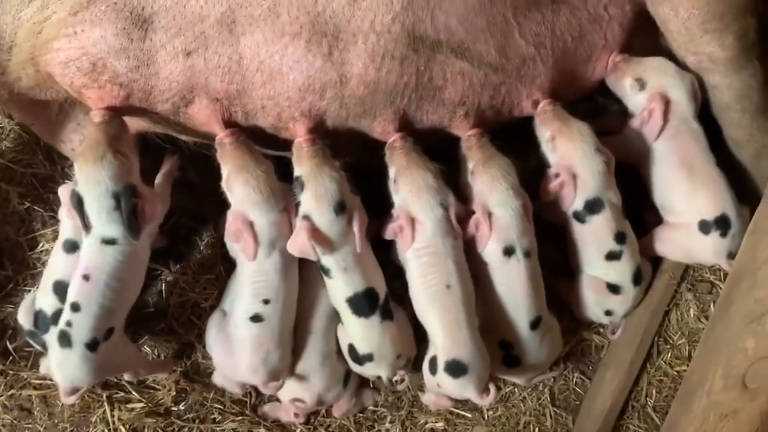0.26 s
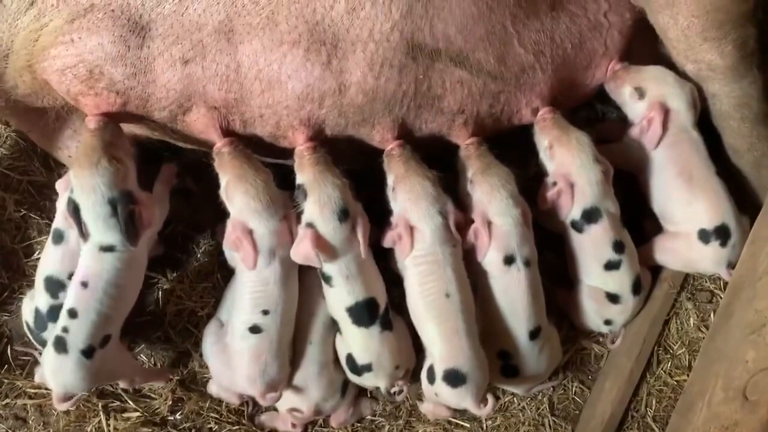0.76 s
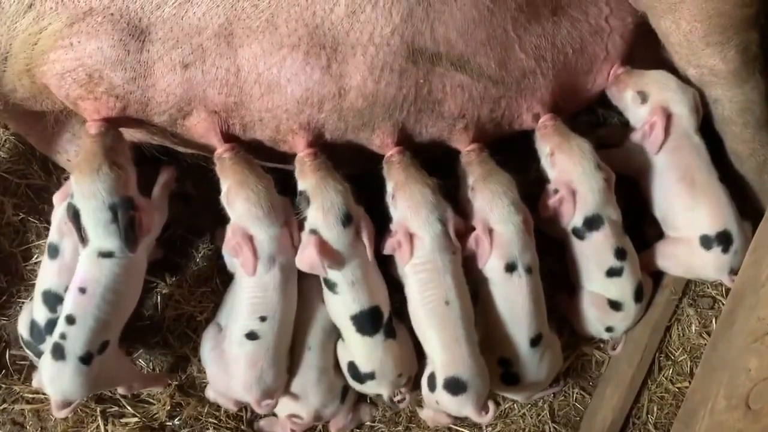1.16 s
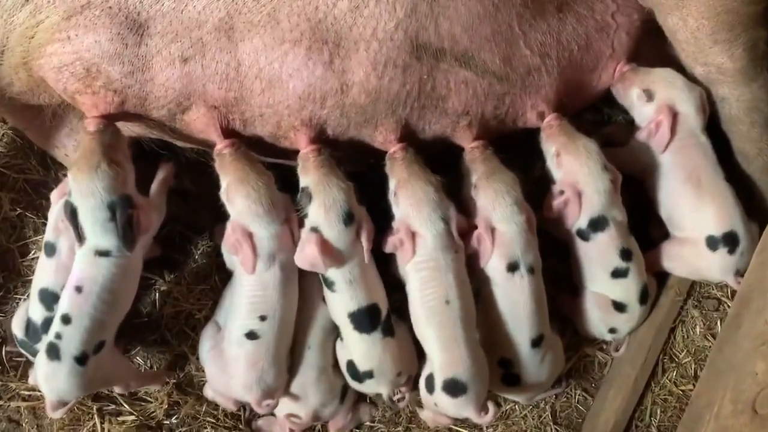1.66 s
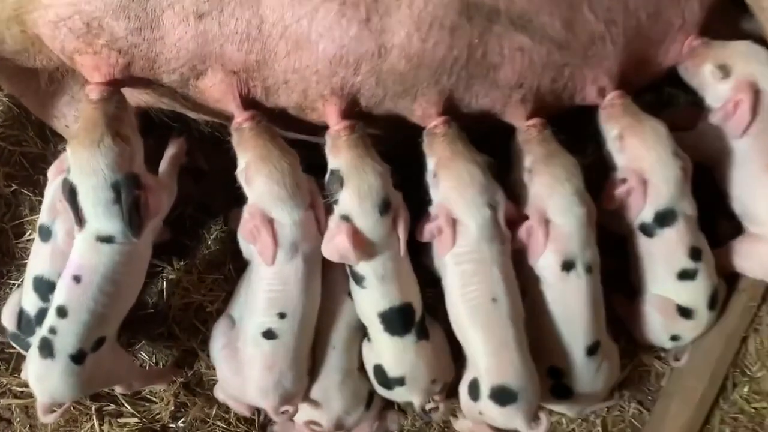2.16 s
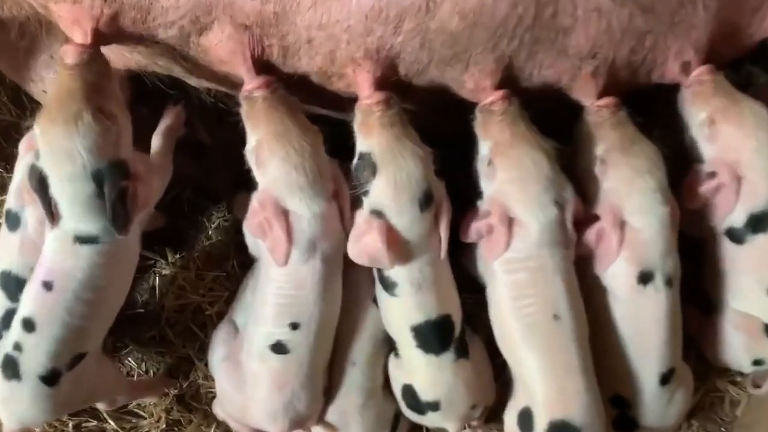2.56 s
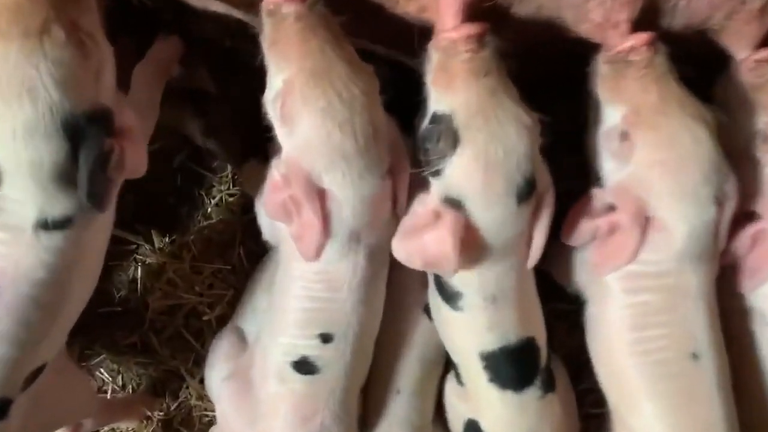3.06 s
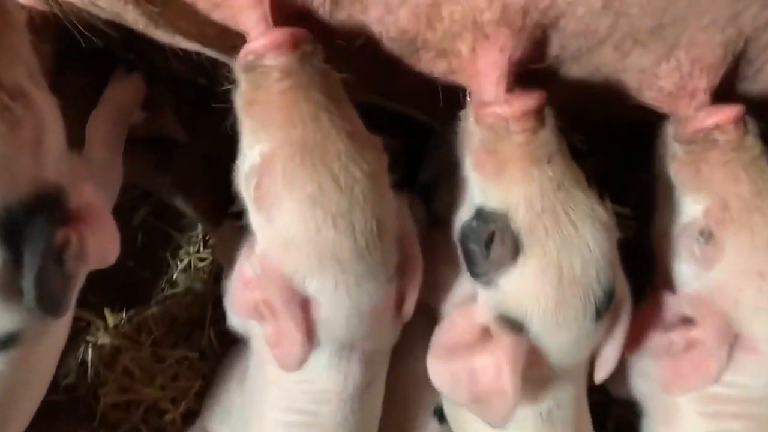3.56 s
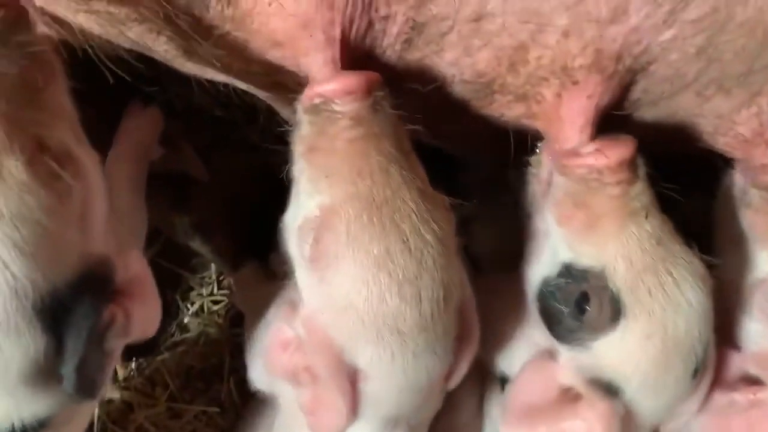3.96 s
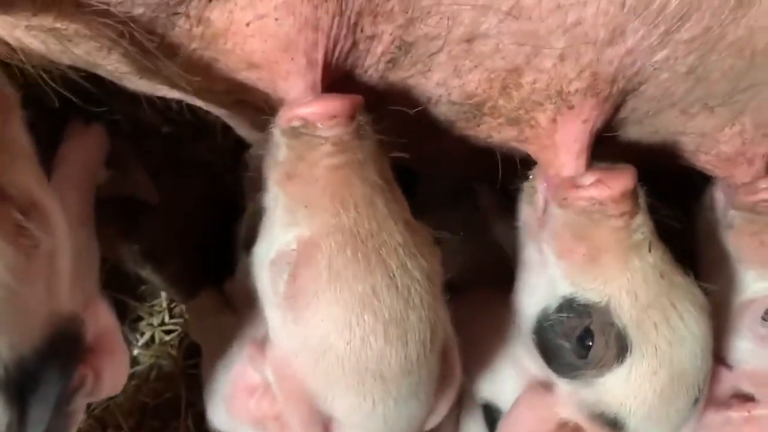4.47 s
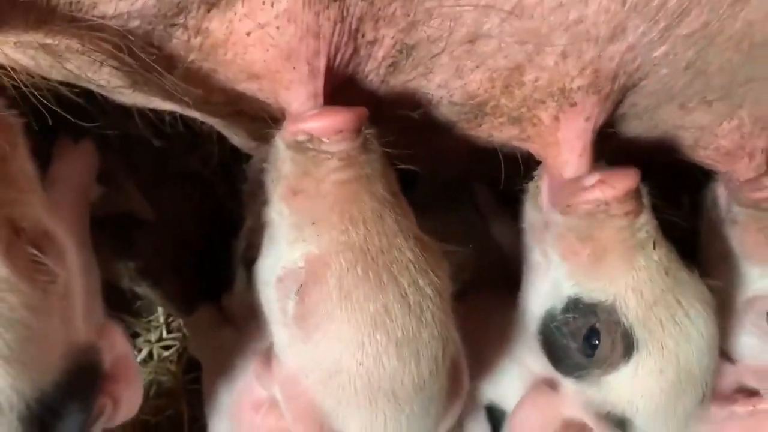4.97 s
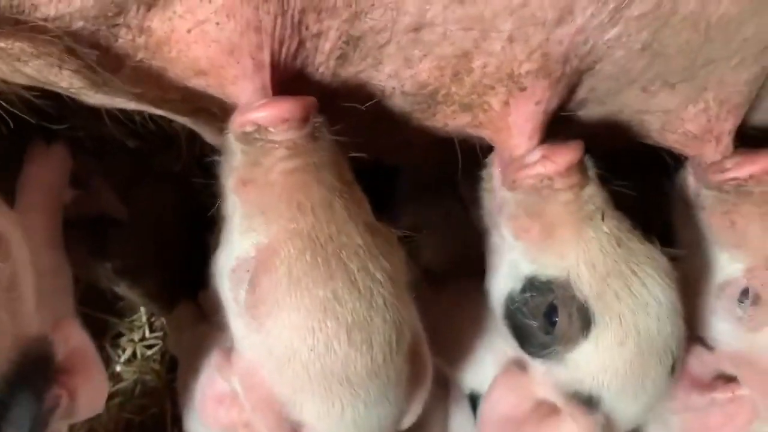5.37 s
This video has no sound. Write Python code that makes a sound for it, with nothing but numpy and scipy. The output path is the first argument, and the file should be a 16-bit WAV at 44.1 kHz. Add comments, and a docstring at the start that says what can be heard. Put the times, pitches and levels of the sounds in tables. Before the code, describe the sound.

A sow gives short, low, fluttering grunts at a steady pace while piglets murmur, squeak faintly and smack at her teats in straw.

```python
"""Sow suckling her litter

In a straw pen a sow lies grunting while her piglets suckle; half way through, the microphone closes in on her.
Each grunt is a flutter of the throat: soft flaps, three strong ones and a quick purr, ringing in her body.
Soft murmurs of piglets and sow are pulses through nose and chest; piglets' squeaks and two faint nasal
whistles of the sow are wavering tones. Smacks and pops at the teats are short rung noise; filtered noise
makes the barn's rumble and the rustling straw."""
import sys
import numpy as np
from scipy import signal
from scipy.fft import rfft, irfft, next_fast_len
from scipy.io import wavfile
from scipy.ndimage import uniform_filter1d

SR = 44100
rng = np.random.default_rng(int(sys.argv[2]) if len(sys.argv) > 2 else 0)


def generate_wav(sig):
    """Save sig (samples, or channels by samples) to the path in sys.argv[1] as 16-bit PCM at SR."""
    pcm = np.round(np.clip(np.atleast_2d(sig).T, -1, 1) * 32767).astype(np.int16)
    wavfile.write(sys.argv[1], SR, pcm)


N = 247842
TIME = np.arange(N) / SR
LEFT_RIGHT = np.array([[1], [-1]])  # signs of a side signal in the two ears


def from_db(db):
    """Decibels to gain."""
    return 10 ** (np.asarray(db) / 20)


def rms_one(x):
    """Scale to unit power."""
    return x / np.sqrt(np.mean(x ** 2) + 1e-20)


def unit_energy(x):
    """Scale a short sound to unit energy."""
    return x / np.linalg.norm(x)


def band(x, low_hz, high_hz, order=3):
    """Causal band-pass."""
    sos = signal.butter(order, [low_hz, min(high_hz, .45 * SR)], "band", fs=SR, output="sos")
    return signal.sosfilt(sos, x + 1e-18)


def resonate(x, modes):
    """Parallel resonances with alternating signs; each mode is (Hz, width Hz, dB)."""
    out = 0
    for k, (hz, width_hz, db) in enumerate(modes):
        r = np.exp(-np.pi * width_hz / SR)
        poles = [1, -2 * r * np.cos(2 * np.pi * hz / SR), r * r]
        gain = (-1) ** k * from_db(db) * (1 - r * r) / 2
        out = out + gain * signal.lfilter([1, 0, -1], poles, x + 1e-18)
    return out


def add(track, s, sound):
    """Mix a short sound into a track at a given time."""
    at = round(s * SR)
    first, last = max(at, 0), min(at + sound.shape[-1], N)
    if first < last:
        track[..., first:last] += sound[..., first - at:last - at]


def drift(rate_hz):
    """A random wobble through normal knots of spread 1, joined by straight lines."""
    knots = rng.standard_normal(int(N / SR * rate_hz) + 2)
    return np.interp(TIME * rate_hz, np.arange(len(knots)), knots)


def pan(db):
    """Gains of the two ears for a left-right difference."""
    return from_db(LEFT_RIGHT * db / 2)


def right_later(x, lag_s):
    """Delay the right ear, also by a fraction of a sample."""
    hz = np.arange(N // 2 + 1) * SR / N
    return np.array([x[0], irfft(rfft(x[1]) * np.exp(-2j * np.pi * hz * lag_s), N)])


def scatter(x, paths):
    """Repeated short reflections (all-pass) smear each pulse, differently for each ear."""
    size = next_fast_len(N + SR // 4)
    khz = np.arange(size // 2 + 1) * SR / size / 1000
    spectrum = rfft(x, size)
    for left_ms, right_ms, reflection in paths:
        delay = np.exp(-2j * np.pi * khz * np.array([[left_ms], [right_ms]]))
        spectrum = spectrum * (delay - reflection) / (1 - reflection * delay)
    return irfft(spectrum, size)[:, :N]


def stereo_noise(spectrum, side_db):
    """Coloured noise with a mid of unit power and a side at the given level."""
    hz, db = np.transpose(spectrum)
    bins_hz = np.arange(N // 2 + 1) * SR / N
    colour = from_db(np.interp(np.log(bins_hz + 1), np.log(hz), db, left=-90, right=-90))
    mid, side = irfft(rfft(rng.standard_normal((2, N))) * colour, N)
    return rms_one(mid) + from_db(side_db) * rms_one(side) * LEFT_RIGHT


# Spectra of the barn's rumble, the straw's rustle, its hiss and the fine fizz on top.
# Each row: frequency in Hz, relative density in dB per Hz.
RUMBLE_SPECTRUM = [(25, -14), (40, -32.5), (49, 5), (62, -6.5), (100, -15.5), (150, -11.5), (200, -16.5),
                   (320, -23.5), (600, -45)]
RUSTLE_SPECTRUM = [(120, -56), (200, -5), (476, -2), (773, -6), (854, -8.5), (1570, -7), (1870, -8.5),
                   (2150, -6.5), (2550, -9), (4920, -16), (6000, -20.5), (7800, -29.5), (13200, -120)]
HISS_SPECTRUM = [(3500, -44), (5400, -11), (7000, 6), (9000, 0.5), (11000, 0), (12500, -35)]
FIZZ_SPECTRUM = [(12000, -32), (14000, -7), (15500, -3), (17000, -28.5)]
# How busily the litter stirs in the straw. Each row: time in seconds, underlying level of the hiss in dB.
STIRRING = [(0.0, -74), (1.27, -77), (1.39, -79.5), (1.55, -73.5), (1.91, -83), (3.01, -66), (3.13, -62),
            (3.4, -70.5), (4.37, -75), (4.82, -70.5), (4.98, -74), (5.18, -74.5), (5.43, -69.5),
            (5.62, -67.5)]
STIR_DB = 3.3  # spread of the random stirring
TEAT_LAG_S = .000026  # small sounds from the teats and straw reach the right ear this much later


def background(rumble_db=-61.5, rustle_db=-73.0, fizz_db=-4.5, crackle_db=2.0, rumble_follows=0.25):
    """Low barn rumble, and straw noise that rustles and crackles in clumps as the litter stirs."""
    busy_db = np.interp(TIME, *np.transpose(STIRRING))
    swing_db, stir_db = busy_db - busy_db.mean(), STIR_DB * drift(35)
    rumble_level_db = rumble_db + rumble_follows * swing_db
    rustle_level_db = rustle_db + swing_db + stir_db + crackle_db * drift(300)
    hiss_level_db = busy_db + stir_db + crackle_db * drift(500)
    fizz_level_db = fizz_db + busy_db + stir_db + 2 * STIR_DB * drift(45) + crackle_db * drift(460)
    rumble = from_db(rumble_level_db) * stereo_noise(RUMBLE_SPECTRUM, side_db=-26)
    rustle = from_db(rustle_level_db) * stereo_noise(RUSTLE_SPECTRUM, side_db=4.5)
    hiss = from_db(hiss_level_db) * stereo_noise(HISS_SPECTRUM, side_db=-18.5)
    fizz = from_db(fizz_level_db) * stereo_noise(FIZZ_SPECTRUM, side_db=-6.5)
    return rumble + rustle + right_later(hiss + fizz, TEAT_LAG_S)


MURMUR_JITTER, MURMUR_AIR = .05, .5  # spread of the pitch as a share, gain of the air


def murmur_voice(hz):
    """Uneven pulses with a puff of air in each cycle; gives the voice and the puffs alone."""
    cycles = np.cumsum(hz * (1 + MURMUR_JITTER * drift(90)[:len(hz)])) / SR
    puffs = rms_one(rng.standard_normal(len(hz)) * np.exp(-2.5 * (cycles % 1)))
    pulses = rms_one(np.diff(np.floor(cycles), prepend=-1))
    return pulses + MURMUR_AIR * puffs, puffs


# Resonances above the nose tone. Each row: frequency in Hz, width in Hz, relative level in dB.
NOSE_OVERTONES = [(810, 50, -2.5), (953, 130, 1.5), (1340, 440, -8), (1850, 180, -8)]
NOSE_SKIRT_HZ = 318  # added to the nose width: a broad resonance that darkens both sides of the tone


def murmur_nose(voice, hz, width_hz, overtones_db):
    """One compact nose tone, two resonances in a row, with further resonances above it."""
    narrow = resonate(voice, [(hz, width_hz, 0)])
    tone = resonate(narrow, [(hz, NOSE_SKIRT_HZ + width_hz, 0)])
    return band(tone - from_db(overtones_db) * resonate(voice, NOSE_OVERTONES), 320, 2300)


# Soft low grunts and murmurs, some the piglets', some the sow's own just before her grunts.
# Each row: start in seconds, swell in seconds, start pitch in Hz, top pitch in Hz,
# chest in dB, depth of the chest in dB, nose in dB, hiss in dB (these levels before the common lift),
# nose in Hz, nose width in Hz, overtones in dB, left-right difference in dB.
MURMURS = [(-.06, .047, 143, 156.8, -53.5, 5, -67, -86, 480, 150, -27, -1),
           (.022, 0.044, 112.5, 120.6, -53, 6, -48.5, -71, 482, 88, -25, -2),
           (0.234, 0.036, 111.1, 109.6, -50, -1.5, -56, -71, 465, 250, -6, -1),
           (.867, 0.036, 106.1, 130.3, -43, -3, -45.5, -61.5, 554, 63, -17, -2.5),
           (1.018, 0.013, 95, 101.6, -56.5, -23, -56.5, -76, 390, 104, -35, 1),
           (1.172, 0.075, 117.5, 163.9, -35.5, -2, -41, -55, 543, 66, -16.5, -2),
           (1.4, .03, 112.3, 131.5, -49, -3, -56.5, -72.5, 490, 187, -3, -1.5),
           (2.15, 0.085, 85.2, 99.3, -47, -3, -55.5, -77.5, 430, 170, -15, -0.5),
           (2.928, 0.075, 57.6, 111.9, -44.5, -1.5, -37.5, -71.5, 544, 29, -26, -2.5),
           (4.545, 0.0032, 130.5, 152.5, -51.5, 0, -67, -78, 420, 150, -20, -3)]
# Resonances of a murmur's chest and of its hiss. Each row: frequency in Hz, width in Hz, relative level in dB.
MURMUR_CHEST = [(161, 29, 5.5), (258.6, 17, 7), (370, 39, -7)]
MURMUR_HISS = [(3870, 300, 19.5), (4700, 240, -7)]
# Each murmur opens in the nose and sinks into the chest; rows for chest, nose and hiss.
# Each row: growth over the swell in dB, delay of the peak in seconds, release in dB per second.
MURMUR_ENVELOPES = [(18.5, 0.025, 328.5), (8.85, 0.0027, 315.5), (22.7, .002, 382.5)]
MURMUR_ATTACK_S, MURMUR_TAIL_S, MURMUR_SAG_HZ_PER_S = 0.0063, 0.21, 30


def murmurs(lift_db=3.0):
    """Each soft grunt swells while its pitch glides, mostly up, peaking first in the nose, then in the chest."""
    out, t = np.zeros((2, N)), TIME[:SR // 4]
    for (s, swell_s, start_hz, top_hz, chest_db, depth_db, nose_db, hiss_db,
         nose_hz, width_hz, overtones_db, pan_db) in MURMURS:
        top_s = swell_s + MURMUR_ENVELOPES[0][1]
        glide_hz = np.interp(t, [0, top_s], [start_hz, top_hz])
        voice, puffs = murmur_voice(glide_hz - MURMUR_SAG_HZ_PER_S * np.maximum(t - top_s, 0))
        # the depth sets the lowest chest resonance alone
        chest = [(hz, width, db + depth_db * (k == 0)) for k, (hz, width, db) in enumerate(MURMUR_CHEST)]
        parts = [band(resonate(voice, chest), 110, 540),
                 murmur_nose(voice, nose_hz, width_hz, overtones_db),
                 band(resonate(puffs, MURMUR_HISS), 4700, 9200, order=2)]
        gate = np.clip(np.minimum(t, swell_s + MURMUR_TAIL_S - t) / MURMUR_ATTACK_S, 0, 1)
        for part, db, (growth_db, delay_s, release) in zip(parts, [chest_db, nose_db, hiss_db], MURMUR_ENVELOPES):
            peak_s = swell_s + delay_s
            shape_db = -growth_db * np.maximum(1 - t / peak_s, 0) - release * np.maximum(t - peak_s, 0)
            even = part / np.sqrt(uniform_filter1d(part ** 2, SR // 35) + 1e-12)  # level out the power
            add(out, s, pan(pan_db) * even * gate * from_db(lift_db + db + shape_db))
    return np.array([out[0], np.interp(TIME - .0003, TIME, out[1])])  # right ear 0.3 ms later


FIRST_LEAD_GAPS = 1.8  # the earliest soft flap comes this many lead-in gaps before the burst
PURR_JITTER_S, PURR_UNEVEN_DB = .0015, 3


def beats(grunt, count=7):
    """Two soft flaps, three strong ones and an uneven purr: (time from the burst s, dB)."""
    _, lead_gap, first_gap, second_gap, purr_gap, *_, first_db, third_db = grunt
    heavy = first_gap + second_gap
    late, uneven = rng.standard_normal((2, count))
    soft = [(-FIRST_LEAD_GAPS * lead_gap, 0), (-lead_gap, 0)]
    strong = [(0, first_db), (first_gap, 0), (heavy, third_db)]
    purr = heavy + purr_gap * np.arange(1, count + 1) + PURR_JITTER_S * late
    return soft + strong + list(zip(purr, PURR_UNEVEN_DB * uneven))


BELLY, CHEST, THROAT, MOUTH, SNOUT, WHISTLE, RASP = range(7)
# How each register, belly up to rasp, swells and dies in a grunt. Each row: full level in dB before the drive,
# lead-in in dB, first flap in dB, hold until seconds, release in dB per second (in the stretched time of the purr).
ENVELOPES = [(-30, -12.5, -6.5, .15, 259), (-26, -17, -6.5, 0.088, 271), (-27, -25.5, -9, 0.089, 284.5),
             (-28, -30, -9, 0.069, 291), (-33, -29.5, 1, 0.044, 184.5), (-40, -31, 5, 0.025, 168.5),
             (-48, -31, -2.5, 0.029, 111)]
# the soft lead-in: its length and its growth; then the throat bursts open
LEAD_IN_S, LEAD_RISE_DB_PER_S, BURST_S = .16, 118, 0.044


def grunt_effort(ages, grunt, register):
    """A soft lead-in, a burst at the first flap, full strength at the second, a hold and a steady release; in dB."""
    _, lead_gap, first_gap, second_gap, _, stretch, level_db, lead_in_db, surge_db, bright_db, dulling_db = grunt[:11]
    chest_db, throat_db, mouth_db, snout_db, rasp_db = grunt[11:16]
    full_db, lead_db, first_db, hold_s, release = ENVELOPES[register]
    heavy, height = first_gap + second_gap, register / RASP
    stage = np.minimum(ages, heavy) + np.maximum(ages - heavy, 0) / stretch
    attack_db = np.interp(stage, [-BURST_S, 0, first_gap], [lead_db + lead_in_db, first_db, 0])
    rise_db = LEAD_RISE_DB_PER_S * np.minimum(stage + lead_gap, 0)
    shape_db = attack_db + rise_db - release * np.maximum(stage - hold_s, 0)
    treble_db = height * (bright_db - dulling_db * np.clip(ages / first_gap, 0, 1))
    bass_db = (1 - height) ** 2 * surge_db * np.clip((ages - first_gap) / second_gap, 0, 1)
    own_db = [0, chest_db, throat_db, mouth_db, snout_db, 0, rasp_db][register]
    return level_db + full_db + shape_db + treble_db + bass_db + own_db


SINK_PER_S = .7


def slackening(age, grunt, register):
    """Chest, throat and mouth slacken as a grunt dies: the share of its pitch a register keeps."""
    purring_s = max(age - grunt[2] - grunt[3], 0)
    return 1 - SINK_PER_S * purring_s * (register in (CHEST, THROAT, MOUTH))


PUFF_S, FLOW_DB = 0.0041, -19
THROAT_SHIFT = .008  # her throat changes shape a little from flap to flap: spread of pitch as a share
PURR_SOFTER_DB = 3  # the purr is softer in throat and mouth, so each strong flap stands alone


def flaps(grunts, rhythms, register, air, ring):
    """Each flap of the throat is a snap and a puff that sets a register ringing, over a thin flow of air."""
    out, flow = np.zeros((2, N))
    t, ages = TIME[:SR // 25], TIME[:SR // 2] - LEAD_IN_S
    steps = np.arange(len(ring))
    for grunt, rhythm in zip(grunts, rhythms):
        start, purr_gap = grunt[0], grunt[4]
        effort = from_db(grunt_effort(ages, grunt, register))
        breath = rng.standard_normal(len(ages)) / np.sqrt(purr_gap * SR)
        add(flow, start + ages[0], from_db(FLOW_DB) * effort * breath)
        for age, db in rhythm:
            puff = unit_energy(rng.standard_normal(len(t)) * t * np.exp(-t / PUFF_S))
            flap = np.sqrt(air) * puff
            flap[0] += np.sqrt(1 - air)  # the snap
            purring = age > grunt[2] + grunt[3]
            db = db - PURR_SOFTER_DB * (register in (THROAT, MOUTH) and purring)
            # reading the ring slower or faster shifts its pitch
            pitch = slackening(age, grunt, register) + THROAT_SHIFT * rng.standard_normal()
            shifted = np.interp(steps * pitch, steps, ring, right=0)
            sound = unit_energy(signal.fftconvolve(flap, shifted))
            add(out, start + age, from_db(db) * np.interp(age, ages, effort) * sound)
    return out + signal.oaconvolve(flow, unit_energy(ring))[:N]


# Air spraying from her nostrils with each flap. The row: low edge in Hz, high edge in Hz, level over the rasp in dB.
NOSTRIL_AIR = (4400, 6340, -14)


def nostril_air(grunts, rhythms, tap):
    """A faint spray of pure noise puffs follows the rasp of every grunt."""
    low_hz, high_hz, db = NOSTRIL_AIR
    return from_db(db) * flaps(grunts, rhythms, RASP, 1, band(tap, low_hz, high_hz, order=2))


# The sow's grunts. Each row: first strong flap in seconds, lead-in gap, first gap, second gap and purr gap in seconds,
# purr stretch as a factor, level in dB, lead-in in dB, surge of the bass at the third flap in dB, brightness in dB,
# dulling after the first flap in dB, chest, throat, mouth, snout and rasp in dB, first flap and third flap in dB.
GRUNTS = [(.082, 0.056, 0.046, 0.039, .0195, 0.61, -2.5, 1.5, -1.5, 4.5, 6.5, 0.5, 1, 1, -.5, -0.5, -2.5, -2.5),
          (.606, 0.043, 0.048, 0.04, .0205, 0.61, -5.5, 1, -2, 0, -6.5, -1, 0.5, 0.5, 0.5, -2, 2, 3),
          (1.482, 0.048, .048, .045, .0215, 0.82, -1, 0, 2, 0, 0.5, 0.5, 1.5, 0.5, 1, 3.5, -1, -0.5),
          (2.268, .054, 0.048, 0.04, .02, 0.85, -3, 0.5, -2, 0.5, 0.5, 0, 3, 0.5, 0.5, 4.5, -2, 3),
          (3.109, 0.063, 0.045, 0.024, .02, 0.94, 0, -4, -5.5, -2, 0, 0.5, 1.5, 7.5, 0, 3.5, 0.5, 1),
          (3.883, .05, .048, .043, .019, 0.7, -.5, .5, 1.5, 0, 0.5, 1, -2, 6, 2.5, -0.5, -1, 1),
          (4.657, 0.062, 0.049, 0.042, .021, 0.83, -1, -1, 2.5, 6, 4, 1.5, -4, 4, 1.5, 0.5, -0.5, 0.5),
          (5.497, 0.064, 0.046, 0.035, .021, 0.58, 1.5, -1, 0.5, -1.5, -1.5, 1, -5, 5, 1.5, 1.5, 0.5, -1.5)]
# Her registers from belly to rasp. Each row: low limit in Hz and high limit in Hz of the resonances it takes,
# share of turbulent air 0-1, head start in seconds.
REGISTERS = [(37.8, 150, 0.06, 0.0025), (150, 420, 0.24, 0.00281), (420, 700, 0.19, .0019),
             (795, 1100, 0.13, 0.002355), (1370, 2150, 0.15, .001), (2150, 2950, .23, 0.00253),
             (2950, 5500, .86, 0.0024)]
# Resonances of the sow and her corner, heard from afar, from half way and from close by.
# Each row: frequency in Hz before slackening, width in Hz before damping, relative level in dB.
FAR_MODES = [(46.5, 20, 2.5), (76.3, 12.6, 7.5), (116.7, 9.6, -4), (158, 11, 0.5), (302, 34.5, -1),
             (336, 27, -1), (391.4, 31, 1.5), (486, 116, -7), (549, 36, -1), (578.4, 50, -3.5),
             (836, 45, 2), (900, 54, 6.5), (990, 77, 3), (1478, 36, 5.5), (1744, 64, 0.5), (1841, 59, 2.5),
             (2110, 29, -11), (2270, 110, -1.5), (2600, 200, 0), (2730, 120, 2.5), (3244, 140, -2.5),
             (3820, 240, -3.5), (4510, 220, -8.5)]
HALF_WAY_MODES = [(47, 30, -1.5), (76, 41, -1.5), (110, 28, 1), (159, 27, -7), (222, 12, -2),
                  (260.6, 27, 6), (300, 39, 6.5), (427, 31, 1.5), (460, 40, -2.5), (539, 29, -1),
                  (670, 22, 2.5), (890, 170, -4.5), (1010, 28, 13.5), (1424, 90, -7), (1655, 110, -7),
                  (1860, 60, -2), (2190, 110, -3), (2570, 100, -8.5), (2860, 110, -4), (3280, 170, -10),
                  (3660, 270, -8.5), (4520, 300, -12.5)]
NEAR_MODES = [(48.7, 26, 0), (77, 33, -5), (112.4, 25.6, -1), (161, 39, -5.5), (220.3, 10.7, 0),
              (265.7, 14, 8), (314.5, 19, 4.5), (390.5, 16.5, -2), (441, 30, -0.5), (482, 39, -6.5),
              (540, 36, -2.5), (634, 21, -1.5), (834, 65, 4), (901, 190, 0), (1015.6, 27, 6),
              (1430, 70, -14.5), (1529, 68, -7.5), (1778, 81, -7.5), (1844, 42, 3), (2294, 60, 0),
              (2577, 94, 0.5), (2810, 120, -3.5), (3260, 180, -7.5), (3660, 280, -10.5), (4070, 200, -13.5),
              (4680, 95, -11.5)]
# Scattering among boards and bodies at the same three distances.
# Each row: left delay in ms, right delay in ms, reflection 0-1.
FAR_PATHS = [(1.069, 0.6706, .8), (1.3, 1.636, 0.62), (1.88, 1.95, 0.41), (5.0, 4.91, 0.62)]
HALF_WAY_PATHS = [(.4, .5, .79), (.97, 0.828, 0.67), (1.27, 1.56, 0.71), (3.25, 3.11, 0.34)]
NEAR_PATHS = [(.76, 1.123, 0.66), (1.4, 1.02, 0.59), (2.12, 2.3, 0.36), (5.418, 5.25, 0.74)]
FLESH_DECAY_S = .018  # soft flesh damps the registers from the throat up between flaps


def sow(grunts, modes, paths, drive_db, belly_db):
    """The same flaps ring in seven registers of her body, from the belly up to the rasp of the nostrils."""
    rhythms, tap = [beats(grunt) for grunt in grunts], signal.unit_impulse(SR // 6)
    out = nostril_air(grunts, rhythms, tap)
    for register, (low_hz, high_hz, air, head_start_s) in enumerate(REGISTERS):
        own = [mode for mode in modes if low_hz <= mode[0] < high_hz]
        ring = band(resonate(tap, own), low_hz * 0.78, high_hz * 1.065, order=2)
        if register >= THROAT:
            ring = ring * np.exp(-TIME[:len(ring)] / FLESH_DECAY_S)
        gain = from_db(belly_db * (register == BELLY))
        add(out, -head_start_s, gain * flaps(grunts, rhythms, register, air, ring))
    return scatter(from_db(drive_db) * out, paths)


# Thin squeaks of the piglets, and two faint, nearly level nasal whistles in the sow's breath (the last two rows).
# Each row: start in seconds, length in seconds, start pitch in Hz, end pitch in Hz, level in dB,
# waver of the pitch as a share.
SQUEAKS_AND_WHISTLES = [(0.159, 0.037, 3800, 3660, -51.5, 0.032), (0.374, 0.068, 2370, 2134, -61, 0.022),
                        (0.535, 0.054, 3820, 3650, -59, 0.039), (0.818, 0.072, 2920, 2540, -57, 0.032),
                        (1.037, 0.099, 3060, 2680, -60.5, .02), (4.202, 0.25, 1850, 1827, -69, 0.034),
                        (4.97, 0.12, 1840, 1880, -77, 0.047)]


def squeaks_and_whistles():
    """Narrow nostrils whistle: falling squeaks and nearly level tones, each a sine with a fast random waver."""
    out = np.zeros(N)
    for s, length_s, start_hz, end_hz, db, waver in SQUEAKS_AND_WHISTLES:
        size = int(length_s * SR)
        hz = np.linspace(start_hz, end_hz, size) * (1 + waver * drift(468)[:size])
        tone = np.sin(2 * np.pi * np.cumsum(hz) / SR)
        add(out, s, from_db(db) * tone * signal.windows.tukey(size, .6))
    return scatter(out, HALF_WAY_PATHS)


# fainter smacks come at random; their treble stands this far above the litter's stirring, their middle level with it
FAINT_SMACKS_PER_S, FAINT_TREBLE_DB, FAINT_DECAY_S = 4.4, 10.5, 0.0061
FAINT_SPREAD_DB, FAINT_DECAY_SPREAD = 3, .6  # the second is a spread of the log decay


def faint_smacks(count=60):
    """Small smacks of uneven size and length at random moments, stronger when the litter is busy."""
    times = np.cumsum(rng.exponential(1, count)) / FAINT_SMACKS_PER_S
    size, length = rng.standard_normal((2, count))
    levels_db = np.interp(times, *np.transpose(STIRRING)) + FAINT_SPREAD_DB * size
    decays = FAINT_DECAY_S * np.exp(FAINT_DECAY_SPREAD * length)
    return [(s, db + FAINT_TREBLE_DB, db, decay) for s, db, decay in zip(times, levels_db, decays)]


# The loudest smacks of lips on the teats. Each row: start in seconds, treble in dB, middle in dB, decay in seconds.
SMACKS = [(.451, -55, -63, 0.0059), (1.45, -50.5, -50, 0.0084), (1.934, -58, -91, 0.0022),
          (2.497, -61, -69, 0.0016), (3.056, -44, -76, 0.0027), (3.121, -45, -60, 0.0023),
          (3.27, -44, -71, 0.0038), (3.466, -53, -61.5, 0.03), (3.592, -58.5, -75, 0.0065),
          (3.702, -51.5, -62, 0.0029), (3.998, -55.5, -69, 0.022), (4.304, -54, -63, 0.0025),
          (4.388, -53, -64, 0.0013), (4.444, -51, -72, 0.0028), (4.461, -50, -88, 0.0051),
          (4.494, -55, -88, 0.0013), (4.762, -49, -59, 0.0018), (4.883, -50, -49, 0.0026),
          (4.914, -56, -65, 0.024), (4.939, -46.5, -59.5, 0.0073), (4.966, -58, -66, .004),
          (5.134, -55.5, -79, 0.0084), (5.219, -56, -67, 0.0032), (5.272, -58, -74, 0.0056),
          (5.293, -53.5, -72, .003), (5.42, -52.5, -78, 0.0033)]
SMACK_ATTACK_S = .00015


def suckling(grain_db=2.5, side_db=-8):
    """A wet seal breaks in a spray of tiny ticks, with a small pop of the mouth behind it."""
    out, t = np.zeros((2, N)), TIME[:SR // 10]
    for s, treble_db, middle_db, decay_s in SMACKS + faint_smacks():
        ticks = rng.standard_normal((2, len(t))) * from_db(grain_db * rng.standard_normal(len(t)))
        lips = [(rng.uniform(7300, 9300), 2500, 0), (14800, 1500, rng.normal(0, 6.5))]
        spray = rms_one(band(resonate(ticks, lips), 5100, 14000, order=2))
        low_hz = 1150 * np.exp(rng.normal(0, 0.033))
        high_hz = 2700 * np.exp(rng.normal(0, 0.27))
        pop = rms_one(resonate(ticks, [(low_hz, 350, 0), (high_hz, 700, -4)]))
        shape = np.exp(-t / decay_s) * (1 - np.exp(-t / SMACK_ATTACK_S))
        mid, side = (from_db(treble_db) * spray + from_db(middle_db) * pop) * shape
        add(out, s, mid + from_db(side_db) * side * LEFT_RIGHT)
    return right_later(out, TEAT_LAG_S)


# Short snorts that close some of her grunts. Each row: start in seconds, length in seconds, level in dB.
SNORTS = [(1.612, 0.036, -47.5), (2.395, 0.074, -62), (4.014, 0.026, -45), (4.797, 0.018, -41.5)]
# Resonances of a snort. Each row: frequency in Hz, width in Hz, relative level in dB.
SNORT_MODES = [(1580, 120, -6), (1870, 83, -2.5), (4180, 290, -15.5)]


def snorts():
    """The last air of a grunt leaves through the snout in one short puff of resonant noise."""
    out = np.zeros(N)
    for s, length_s, db in SNORTS:
        size = int(length_s * SR)
        air = band(resonate(rng.standard_normal(size), SNORT_MODES), 1100, 4600)
        add(out, s, from_db(db) * rms_one(air) * signal.windows.hann(size))
    return scatter(out, NEAR_PATHS)


# Teats popping out of a tight seal. Each row: start in seconds, ring in Hz, width in Hz, level in dB, decay in seconds.
POPS = [(2.672, 2300, 900, -64.5, 0.018), (3.386, 2360, 600, -52, 0.0029), (3.425, 2130, 300, -60.5, 0.018),
        (3.467, 1510, 250, -62, 0.0047), (3.552, 2320, 493, -43.5, 0.0025),
        (3.819, 2550, 395, -39.5, 0.002), (4.583, 900, 350, -48.5, 0.0029),
        (5.007, 595, 300, -61.5, 0.0077), (5.056, 2220, 1190, -67.5, 0.012),
        (5.166, 1540, 710, -58.5, .007), (5.219, 3260, 1410, -51, 0.0046),
        (5.232, 1200, 900, -48.5, 0.0075), (5.318, 3820, 450, -61.5, 0.0073)]


def pops():
    """A burst of air rings briefly in a small mouth: noise through two resonances in a row."""
    out, t = np.zeros(N), TIME[:SR // 25]
    for s, hz, width_hz, db, decay_s in POPS:
        mouth = resonate(rng.standard_normal(len(t)), [(hz, width_hz, 0)])
        ring = rms_one(resonate(mouth, [(hz, 2 * width_hz, 0)]))
        add(out, s, from_db(db) * ring * np.exp(-t / decay_s))
    return out


PEN_T60_S, PEN_WET_DB = 0.21, -8


def barn(x):
    """A short diffuse tail of decaying noise, alike in both ears in the bass."""
    t = TIME[:SR // 2]
    decay = from_db(-60 * t / PEN_T60_S) * (1 - np.exp(-(t / 0.0042) ** 2))
    mid, side = rng.standard_normal((2, len(t))) * decay
    tail = (mid + band(side, 540, 15000, order=2) * LEFT_RIGHT) / np.linalg.norm(mid)
    return x + from_db(PEN_WET_DB) * signal.fftconvolve(x, tail, axes=1)[:, :N]


def scene():
    """The sow, from far to near, with her litter in the barn."""
    far, half_way, near = GRUNTS[:4], GRUNTS[4:5], GRUNTS[5:]
    mother = (sow(far, FAR_MODES, FAR_PATHS, drive_db=25.5, belly_db=1.5)
              + sow(half_way, HALF_WAY_MODES, HALF_WAY_PATHS, drive_db=26.0, belly_db=0.5)
              + sow(near, NEAR_MODES, NEAR_PATHS, drive_db=25.5, belly_db=-1.0)
              + snorts())
    small_sounds = murmurs() + squeaks_and_whistles() + suckling() + pops()
    return background() + barn(pan(-0.6) * mother + small_sounds)


CUTOFF_HZ = 15900


def record(dry):
    """The top is cut steeply by an elliptic low-pass."""
    return signal.sosfilt(signal.ellip(10, .2, 80, CUTOFF_HZ, fs=SR, output="sos"), dry)


dry = scene()
out = record(dry)
generate_wav(out)
```